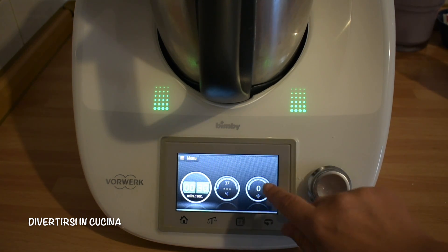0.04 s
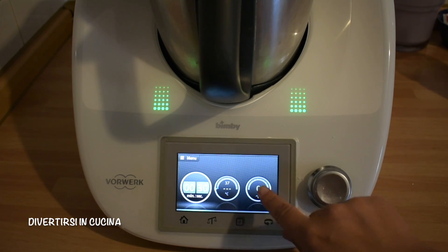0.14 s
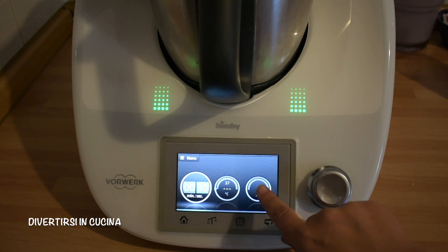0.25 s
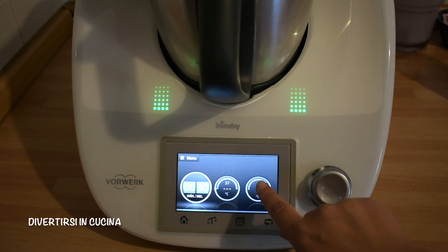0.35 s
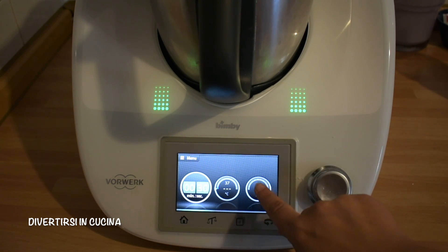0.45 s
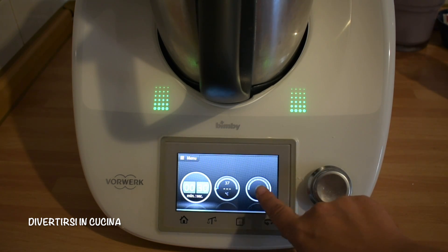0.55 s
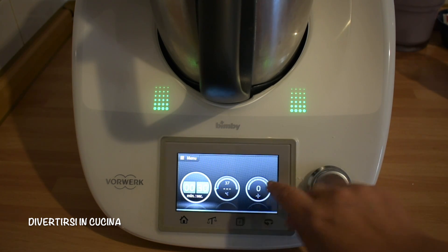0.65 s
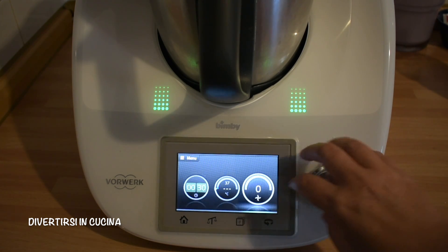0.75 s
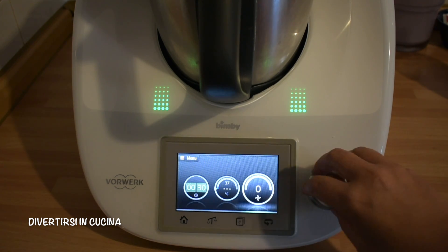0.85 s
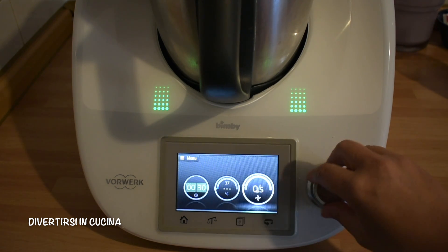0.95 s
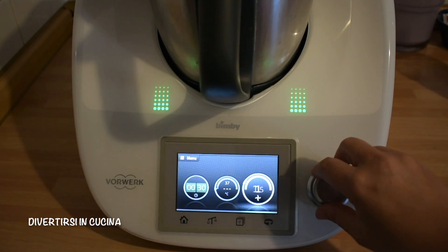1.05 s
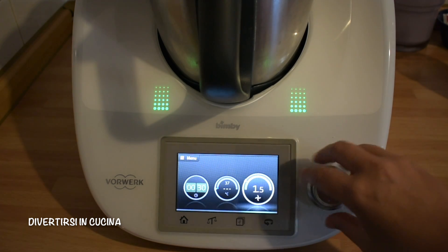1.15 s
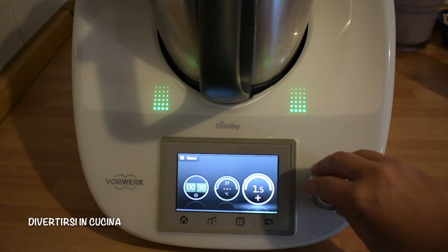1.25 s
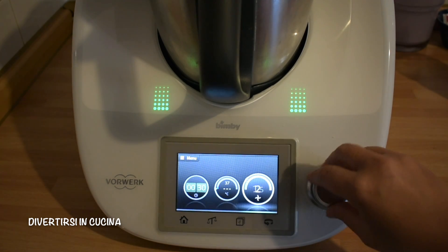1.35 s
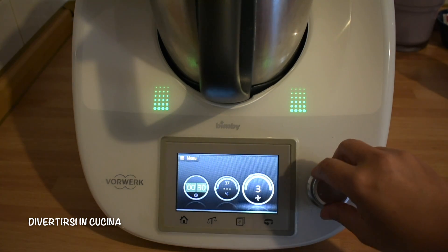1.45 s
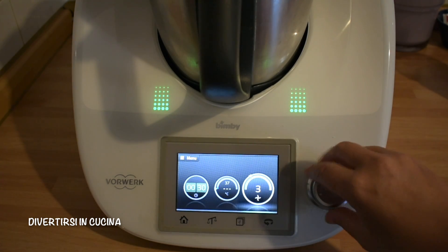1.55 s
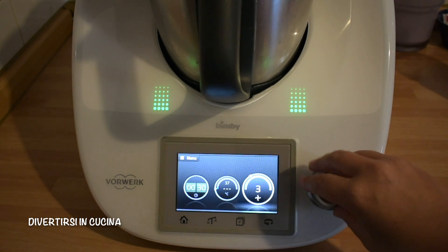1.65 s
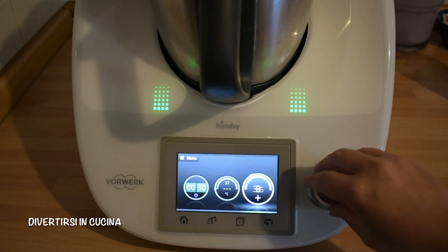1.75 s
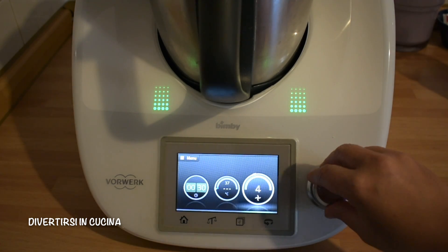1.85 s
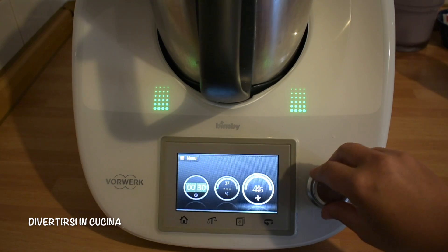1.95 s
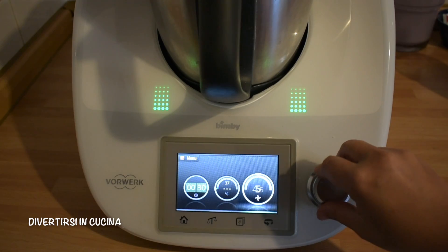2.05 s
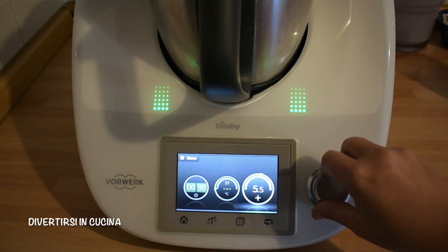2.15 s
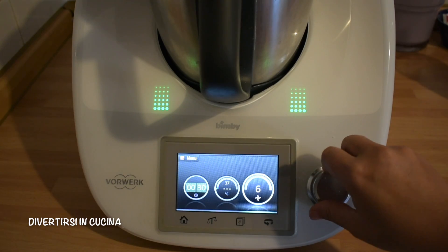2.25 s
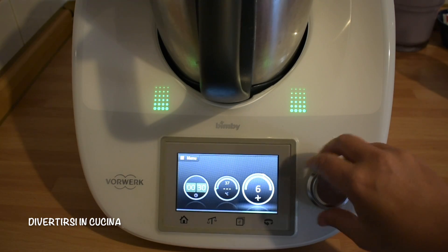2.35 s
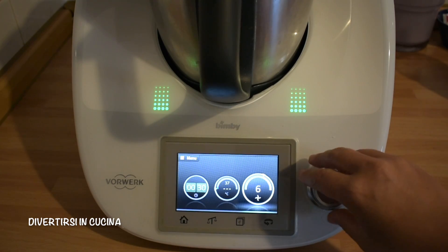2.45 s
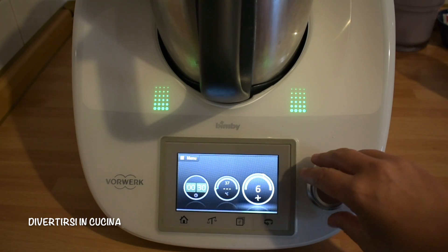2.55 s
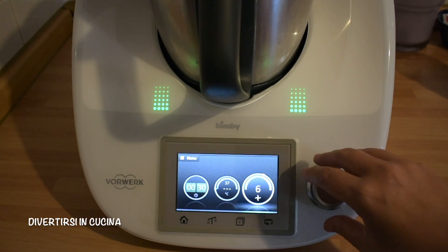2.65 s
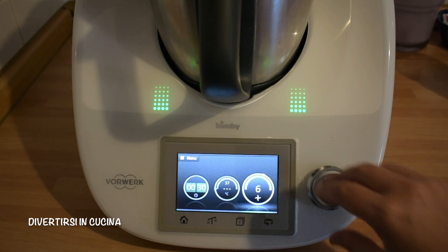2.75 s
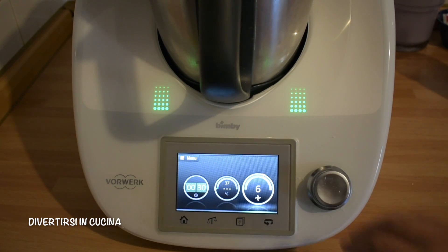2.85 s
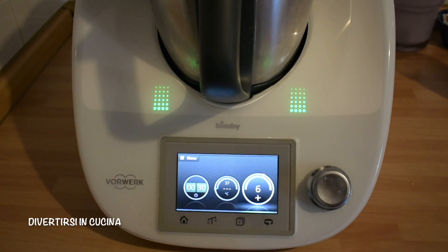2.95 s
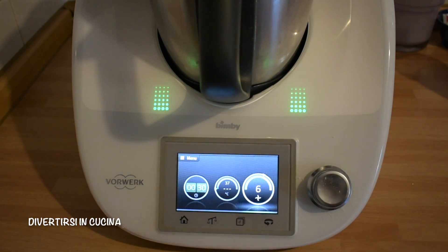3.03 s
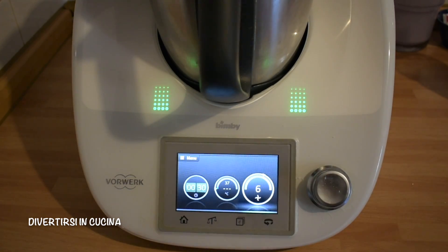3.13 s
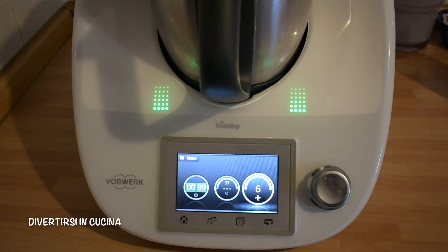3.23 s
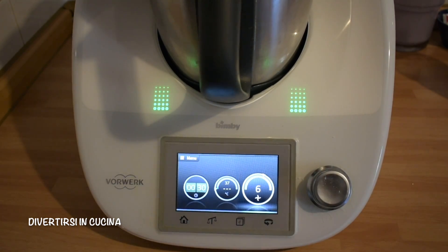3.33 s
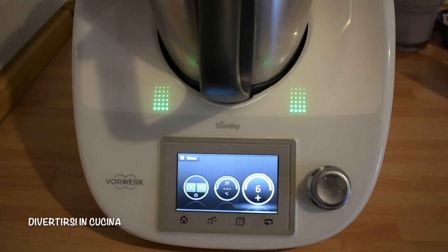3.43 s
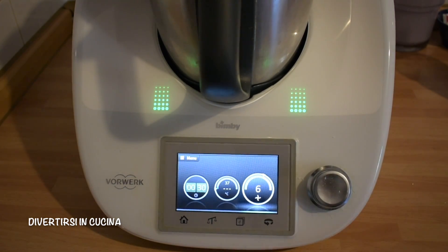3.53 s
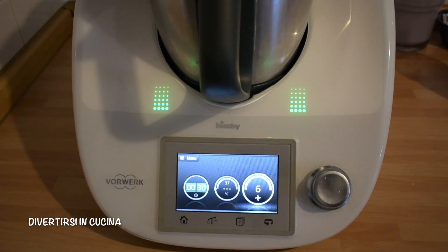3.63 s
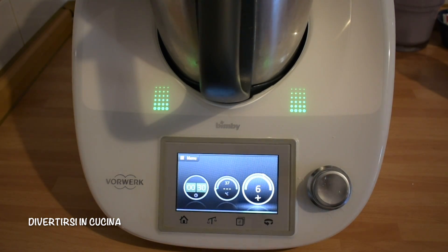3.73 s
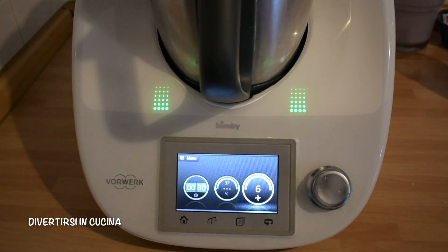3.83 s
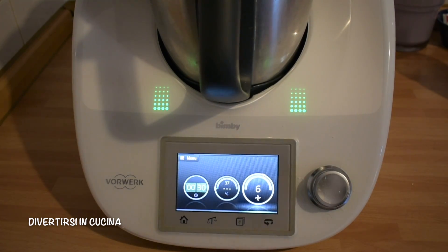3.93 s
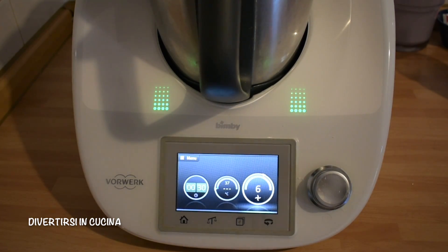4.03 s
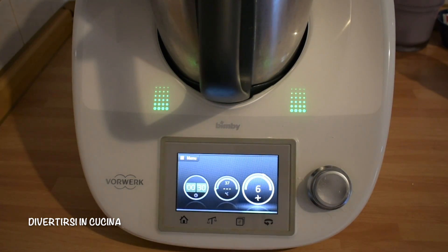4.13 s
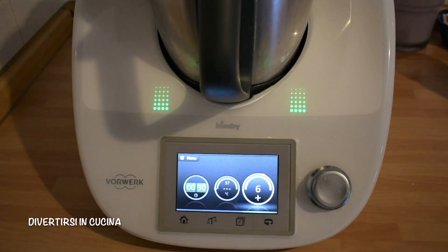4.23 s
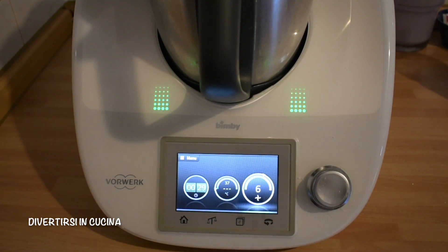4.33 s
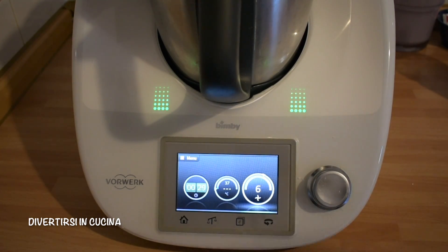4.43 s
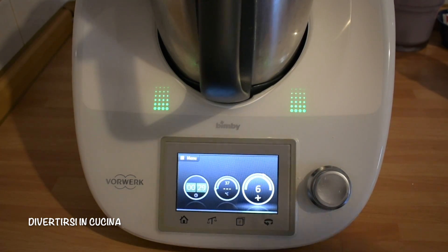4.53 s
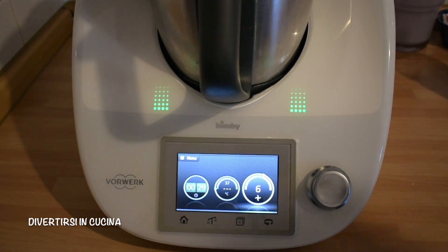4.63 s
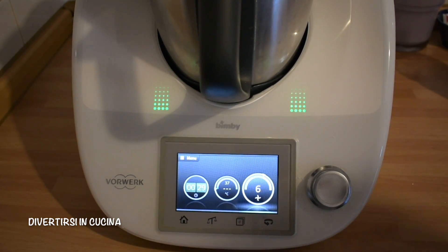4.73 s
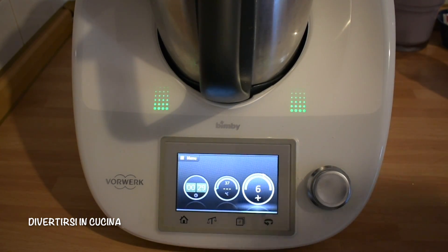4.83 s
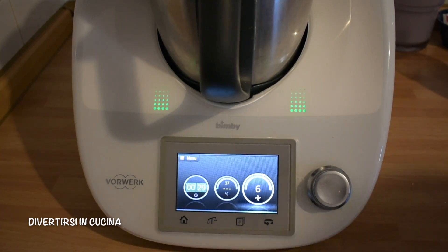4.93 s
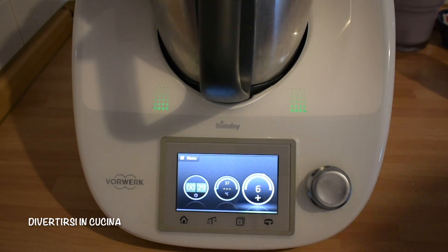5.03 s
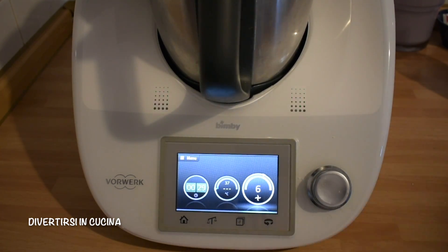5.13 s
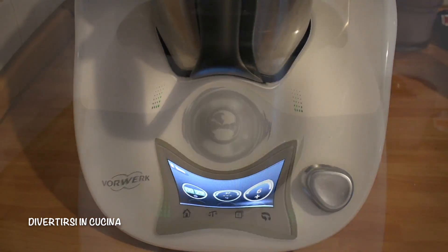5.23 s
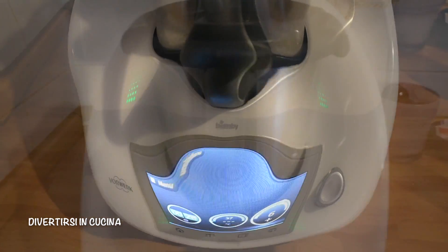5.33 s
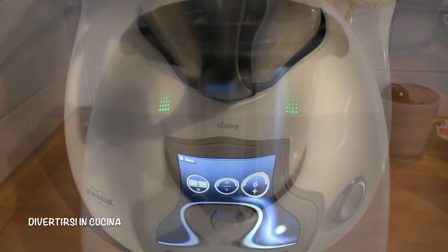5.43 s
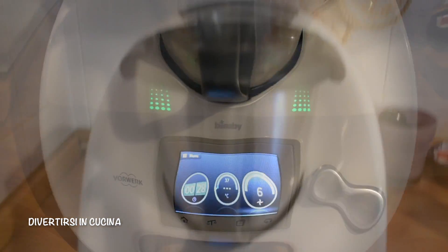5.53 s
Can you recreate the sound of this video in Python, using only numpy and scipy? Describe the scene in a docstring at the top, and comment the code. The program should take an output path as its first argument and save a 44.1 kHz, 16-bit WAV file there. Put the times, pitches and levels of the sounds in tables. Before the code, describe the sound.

Close in a small kitchen, a soft noise fades to near silence. A food processor's dial clicks in uneven bursts while a small geared lid lock whirrs and sags in pitch. After more clicks, coils buzz in steps, the frame squeals, and the motor bursts into a loud whine, grinding nuts in the steel bowl until the end.

```python
"""A kitchen food processor, close to the microphone: its blades grind nuts in the steel bowl under a loud whine.
Before that a soft noise fades out, the speed dial clicks round and a small geared drive locks the lid.
Then coils buzz in steps, the frame squeals and the main motor runs. Whine and howl are partials of the shaft;
clicks, soft noise and grinding are noise or random blows through spectra and resonances.
A small kitchen answers the dial and the lock; a quiet floor of noise lies under it all."""
import sys
import numpy as np
from scipy import signal
from scipy.fft import rfft, irfft, next_fast_len
from scipy.io import wavfile
from scipy.ndimage import map_coordinates

SR = 44100
rng = np.random.default_rng(int(sys.argv[2]) if len(sys.argv) > 2 else 0)


def waveform_to_disk(signal):
    """Save audio, clipped to [-1, 1], as 16-bit WAV at the path in sys.argv[1]."""
    frames = np.transpose(np.atleast_2d(signal))
    scaled = np.clip(frames, -1, 1) * 32767
    samples = np.round(scaled).astype(np.int16)
    wavfile.write(sys.argv[1], SR, samples)


N = 246078


def amp(db):
    """Decibels to gain."""
    return 10 ** (np.asarray(db) / 20)


def unit(x):
    """Scale to rms 1."""
    return x / np.sqrt(np.mean(x ** 2) + 1e-20)


def along(points, hz):
    """Interpolate (Hz, value) points on a log frequency axis."""
    f, v = np.transpose(points)
    return np.interp(np.log(hz + 1), np.log(f + 1), v)


def curves(rows):
    """One value per sample for each column after the time."""
    s, *cols = np.transpose(rows)
    return [np.interp(np.arange(N) / SR, s, c) for c in cols]


def noise():
    """White noise."""
    return rng.standard_normal(N)


def wobble(rate):
    """A smooth random curve, rate knots a second."""
    coarse = np.arange(0, N + 32, 32)
    knots = rng.standard_normal(int(N * rate / SR) + 4)
    smooth = map_coordinates(knots, [coarse * rate / SR])
    return np.interp(np.arange(N), coarse, smooth)


def filtered(x, response):
    """Multiply the spectrum of x by a complex response of frequency."""
    m = next_fast_len(len(x) + SR // 4)
    return irfft(rfft(x, m) * response(np.fft.rfftfreq(m, 1 / SR)), m)[:len(x)]


def coloured(x, spectrum):
    """Shape x with a (Hz, dB) spectrum, at rms 1."""
    return unit(filtered(x, lambda hz: amp(along(spectrum, hz))))


def ringing(x, modes):
    """Ring (Hz, width Hz, dB) resonances of alternating sign with x, at rms 1."""
    def response(f):
        total = 0
        for k, (centre, width, db) in enumerate(modes):
            band = 1j * f * width / (centre ** 2 - f ** 2 + 1j * f * width)
            total = total + (-1) ** k * amp(db) * band
        return total
    return unit(filtered(x, response))


def without_bass(x, edge_hz):
    """A small body radiates no deep bass."""
    return filtered(x, lambda hz: 1 / np.sqrt(1 + (edge_hz / (hz + 1)) ** 12))


def impacts(rate, spread_db):
    """Random tiny blows, rate a second, of widely varying strength."""
    struck = rng.random(N) < rate / SR
    strength = amp(spread_db * np.clip(noise(), -2, 2))
    return unit(struck * noise() * strength)


def tone(turns, order, flutter_db, smear):
    """One partial of a rotation, randomly shaken in level and phase (smear in radians), at rms 1."""
    shake = amp(flutter_db * unit(wobble(14) + wobble(45)))
    drift = smear * unit(wobble(18) + 1.06 * wobble(70))
    return unit(shake * np.sin(2 * np.pi * order * turns + drift))


def held(start, end, rise, fall):
    """Gain that is 1 from start to end (s), rising before and falling after at so many dB a second."""
    t = np.arange(N) / SR
    return amp(-rise * np.maximum(start - t, 0) - fall * np.maximum(t - end, 0))


def hump(s, length):
    """A smooth hump of height 1 around a moment."""
    return np.exp(-np.minimum((2 * (np.arange(N) / SR - s) / length) ** 2, 30))


def echoes(x, t60, wet_db):
    """Dense reflections inside the bowl comb the sound finely."""
    t = np.arange(SR // 8) / SR
    tail = rng.standard_normal(len(t)) * amp(-60 * t / t60)
    answer = signal.fftconvolve(x, tail / np.linalg.norm(tail))[:N]
    return unit(x + amp(wet_db) * answer)


# Quiet of the place, relative spectrum: pitch_hz, level_db
FLOOR = [(15, -40), (25, -34), (75, -5), (119, -7.5), (482, -10), (523, -12.5), (722, -13.5), (1300, -14),
         (1620, -15), (6380, -22.5), (15500, -30)]


def quiet_floor():
    """Steady coloured noise under every other sound."""
    return amp(-58.5) * coloured(noise(), FLOOR)


# Soft opening noise, relative spectrum: pitch_hz, level_db
SOFT = [(24, -40), (40, -7), (178, 1.5), (280, -2.5), (372, -10), (700, -10.5), (1120, -10), (1830, -17.5),
        (4010, -20), (5000, -30), (6710, -27), (14000, -44)]


def fading_noise(start_db=-39, fade_db_per_s=36, sizzle_db=-53):
    """A soft noise fades out steadily; a narrow sizzle rides on it for a moment."""
    fade = amp(start_db - fade_db_per_s * np.arange(N) / SR)
    soft = fade * coloured(noise(), SOFT)
    sizzle = coloured(noise(), [(3500, -32), (4800, 1), (5500, -4), (7000, -30)])
    flicker = amp(sizzle_db + 1.8 * wobble(30))
    return soft + held(0.075, .33, rise=250, fall=84) * flicker * sizzle


# Dial detents and latch knocks, each band's level relative to its base: start_s, middle_db, body_db, sparkle_db
CLICKS = [(0.901, -45, -55, -73), (0.9735, -14.5, -34.5, -38.5), (1.0075, -9.5, -32, -39),
          (1.0273, -21, -27, -58), (1.044, -12.5, -34, -35), (1.109, -13, -44, -36), (1.182, -35, -37, -51),
          (1.4048, -14, -31.5, -36.5), (1.4383, -13.5, -34.5, -38), (1.4713, -16, -45, -34.5),
          (1.83, -13.5, -41, -36.5), (1.8936, -16, -40, -38), (1.938, -23, -46.5, -33),
          (2.0248, -14.5, -35, -37), (2.0835, -29, -45, -32.5), (2.1052, -13, -36, -37),
          (2.1772, -11.5, -33, -35.5), (2.2621, -12, -35, -35), (2.6478, -25, -50.5, -37.5),
          (2.814, -49, -62, -61)]
# Plastic shell, relative spectrum: pitch_hz, level_db
PLASTIC = [(71, -49), (120, -16), (319, -14), (649, -3.5), (995, -4.5), (1270, -9.5), (1950, -0.5),
           (2750, -5), (3240, 0), (3660, -7.5), (4390, -5.5), (4760, -13), (10300, -17.5), (12900, -26),
           (15500, -37)]
BODY_BASE_DB, MIDDLE_BASE_DB, SPARKLE_BASE_DB = 10.0, -5.5, 6.5


def clicks(rebound_s=0.0048, rebound_db=-4, snap_t60=0.029, rise_s=0.001):
    """Each detent snaps, rebounds and rattles the plastic shell for a few milliseconds."""
    out, t = np.zeros(N + SR), np.arange(SR // 8) / SR

    def snap(u):
        """A fast rise and an exponential decay."""
        since = np.maximum(u, 0)
        return (1 - np.exp(-since / rise_s)) * amp(-60 * since / snap_t60)

    shape = np.hypot(snap(t), amp(rebound_db) * snap(t - rebound_s))
    shell = coloured(noise(), PLASTIC)
    above_body = without_bass(shell, edge_hz=1260)
    sparkle = without_bass(shell, edge_hz=7200)
    bands = np.array([unit(shell - above_body), unit(above_body - sparkle), unit(sparkle)])
    for s, middle_db, body_db, sparkle_db in CLICKS:
        at = round(s * SR)
        gains = amp([BODY_BASE_DB + body_db, MIDDLE_BASE_DB + middle_db, SPARKLE_BASE_DB + sparkle_db])
        out[at:at + len(t)] += shape * (gains @ bands[:, at:at + len(t)])
    return out[:N]


# Reverberation of the small kitchen: pitch_hz, t60_s
KITCHEN = [(150, 0.86), (1000, 0.36), (3000, 0.34), (7000, 0.28), (14000, 0.23)]


def kitchen(x):
    """The room's answer, a diffuse tail: each frequency dies at its own speed."""
    out, step = np.zeros(N + 2 * SR), SR // 8
    for at in range(0, N, step):  # a new random tail for each eighth of a second
        hz, t, z = signal.stft(rng.standard_normal(SR // 2), SR, nperseg=256)
        decay = amp(-60 * t / along(KITCHEN, hz)[:, None])
        tail = signal.istft(z * decay, SR, nperseg=256)[1]
        answer = signal.fftconvolve(x[at:at + step], tail / np.linalg.norm(tail))
        out[at + round(.005 * SR):][:len(answer)] += answer  # 5 ms pre-delay
    return out[:N]


# Knocks and snaps that ring on briefly: start_s, pitch_hz, level_db
PINGS = [(.912, 200, -41.5), (1.03, 397, -23), (1.186, 1250, -25), (1.939, 8800, -27), (2.084, 13300, -33),
         (2.648, 12600, -25.5), (2.649, 10000, -35), (2.649, 6330, -32.5), (2.649, 1430, -34.5)]


def pings(t60=0.044, rise_s=0.00067):
    """A stiff part rings in a narrow band after its snap."""
    out, t = np.zeros(N + SR), np.arange(SR // 8) / SR
    for s, hz, db in PINGS:
        ring = ringing(rng.standard_normal(len(t)), [(hz, 120 + .04 * hz, 0)])
        envelope = amp(db - 60 * t / t60) * (1 - np.exp(-t / rise_s))
        out[round(s * SR):][:len(t)] += envelope * ring
    return out[:N]


# Lid lock drive, its mean gear mesh: start_s, pitch_hz
LOCK_SPEED = [(1.0, 1361), (1.12, 1342), (1.18, 1325), (1.215, 1277), (1.39, 1232), (1.5, 1207),
              (1.63, 1118), (1.665, 928), (1.73, 596)]
# How hard it works: start_s, level_db
LOCK_EFFORT = [(1.0, 0.5), (1.2, 0), (1.3, -3), (1.4, 4), (1.5, 0.5), (1.56, 1.5), (1.64, 2.5)]
# Gear whine, relative levels of harmonics 1 to 5: level_db
MESH_DB = [-6.5, 2, 1, -7.5, -8.5]
# Whirr, relative spectrum: pitch_hz, level_db
WHIRR = [(41, -59), (70, -32), (144, -11.5), (655, -14.5), (840, -6.5), (1230, -8.5), (1940, -12),
         (2540, -17), (3120, -8), (3410, -13), (4280, -14.5), (5610, -13), (7350, -25), (15500, -32)]
# Resonances of the drive's mount: pitch_hz, width_hz, level_db
SHELL = [(140, 30, 2.5), (2580, 160, -1), (3270, 180, 1.5), (5670, 270, -18)]
LOCK_ON_S, LOCK_ENGAGED_S, LOCK_OFF_S = 1.0, 1.117, 1.662  # starts, gears take the load, coasts out
GEAR_DB, MOUNT_DB, WHIRR_DB = -35.5, -42.5, -40  # before the effort
SING_HZ, SING_WIDTH_HZ, SING_DB = 3390, 95, 9.5  # a partial swells as it glides through this resonance


def lid_lock(gear_effort=0.26):
    """A small gear drive whirrs, shakes its mount and slows as the arms press on the lid."""
    mesh_hz, effort_db = curves(LOCK_SPEED)[0], curves(LOCK_EFFORT)[0]
    mesh_cycles = np.cumsum(mesh_hz * (1 + .004 * wobble(90))) / SR
    whine = np.zeros(N)
    for k, db in enumerate(MESH_DB, 1):
        swell_db = SING_DB / (1 + ((k * mesh_hz - SING_HZ) / SING_WIDTH_HZ) ** 2)
        whine += amp(db + swell_db) * tone(mesh_cycles, k, flutter_db=3.5, smear=.7)
    whine /= np.linalg.norm(amp(MESH_DB))
    whirr = coloured(impacts(rate=14000, spread_db=1), WHIRR)
    mount = ringing(noise(), SHELL)
    engaged = held(LOCK_ENGAGED_S, LOCK_OFF_S, rise=300, fall=280)
    gears = engaged * (amp(GEAR_DB) * whine + amp(MOUNT_DB) * mount)
    drive = held(LOCK_ON_S, LOCK_OFF_S, rise=870, fall=340) * amp(WHIRR_DB) * whirr
    return without_bass(amp(gear_effort * effort_db) * gears + amp(effort_db) * drive, edge_hz=107)


# The current is switched up in steps, levels at each onset: start_s, buzz_db, frame_db
CURRENT_STEPS = [(2.856, -57, -52), (2.945, -44.5, -46), (3.025, -37.5, -38)]
# Buzz of the windings, relative levels: multiple of the switching rate, level_db
BUZZ = [(1, 4), (2, -1), (3, -5), (4, -17), (6, -21), (12.35, -20)]
# Resonances of the motor's frame, heard here and in spin_up: pitch_hz, width_hz, level_db
FRAME = [(181, 16, -11.5), (880, 37, -6.5), (1025, 50, -5.5), (1370, 97, -13.5), (1675, 62, -6),
         (1870, 17, 4.5), (2570, 500, -26), (3760, 830, -34.5)]
CURRENT_END_S, CURRENT_SAG_DB_PER_S = 3.2, 60  # each step overshoots and settles


def coils(switch_hz=911, hiss_db=-6):
    """The switched current buzzes in the windings and frame, step by step, with a broad hiss."""
    cycles = switch_hz * np.arange(N) / SR
    buzz = unit(sum(amp(db) * tone(cycles, order, flutter_db=5.5, smear=0.83) for order, db in BUZZ))
    hiss = coloured(noise(), [(100, -22), (1300, 4), (3500, -9), (9000, -30)])
    frame = ringing(noise(), FRAME) + amp(hiss_db) * hiss
    ends = [row[0] for row in CURRENT_STEPS[1:]] + [CURRENT_END_S]
    out = np.zeros(N)
    for (s, buzz_db, frame_db), end in zip(CURRENT_STEPS, ends):
        gate = held(s, s, rise=4500, fall=CURRENT_SAG_DB_PER_S) * held(0, end, 0, fall=600)
        out += gate * (amp(buzz_db) * buzz + amp(frame_db) * frame)
    return out


def spin_up(torque_db=-15, squeal_hz=1878, squeal_db=-18.0, twitch_db=-43.0, shudder_db=-31):
    """The frame sings as the rotor twitches into line, then squeals and shudders under the starting torque."""
    twitch = amp(twitch_db) * held(2.886, 2.917, rise=4000, fall=900)
    torque = amp(torque_db) * held(3.105, 3.2, rise=233, fall=310)
    frame = (twitch + torque) * ringing(noise(), FRAME)
    squeal = tone(squeal_hz * np.arange(N) / SR, order=1, flutter_db=3, smear=.6)
    squeal = amp(squeal_db) * held(3.1, 3.2, rise=220, fall=300) * squeal
    rumble = coloured(noise(), [(70, -40), (92, -13), (115, 5), (150, -5), (250, -35)])
    shudder = amp(shudder_db) * held(3.13, 3.22, rise=420, fall=62) * rumble
    return frame + squeal + shudder


# The blades bite into a batch of nuts: height of the bite start_s, length_s, extra load_db
BITES = [(3.227, 0.18, 4.5), (3.543, 0.097, 5.5), (3.883, 0.15, 2), (4.06, .13, 4), (4.525, .13, 6),
         (4.95, .16, 2.5), (5.077, .07, 2.3), (5.236, 0.046, 2.5)]


def load_db():
    """Extra load on the blades: one smooth hump for each bite."""
    return sum(db * hump(s, length) for s, length, db in BITES)


def blades_in_nuts():
    """Steep rise in level as the blades reach the nuts."""
    return held(3.125, N / SR, rise=338.5, fall=0)


# Main shaft, also turning the blades in grinding: start_s, turns_per_s
SHAFT = [(3.05, 85), (3.25, 74), (3.43, 76.6), (3.54, 74), (3.62, 75.6), (3.85, 76.8), (3.95, 76.7),
         (4.03, 76), (4.11, 77), (4.37, 76.6), (4.58, 74.7), (4.68, 79.2), (4.83, 79.4), (4.91, 77.2),
         (5.3, 78), (5.58, 77.7)]
# Weaker partials of the drive: multiple of the shaft, level_db (rms)
PARTIALS = [(3, -38.5), (6, -40), (8, -40), (11, -32.5), (14, -30.5), (17.5, -24.5), (24, -33), (27.5, -33),
            (29.3, -34), (33, -39), (37.6, -36.5)]
WHINE_DB, WHINE_BEST_HZ, WHINE_WIDTH_HZ = -14.7, 911, 42  # loudest on the bowl's resonance
WHINE_CHOKE, HOWL_CHOKE = 1.8, 0.67  # dB lost per dB of load
HOWL_DB, FREE_DB = -14.8, 2.0  # on coarse pieces; swell while the blades run freely
LULL_DB = 5  # the whine recedes for a moment once the coarse pieces are gone
UPPER_SHARE, UPPER_FROM_HZ, UPPER_PER_HZ = 0.39, 77.8, 0.46  # faster, the howl moves half an order up


def motor():
    """The shaft's orders sing with its speed; each bite chokes the whine and the howl."""
    speed, load = curves(SHAFT)[0], load_db()
    turns = np.cumsum(speed) / SR
    resonance = 1 / np.hypot(1, 2 * (12 * speed - WHINE_BEST_HZ) / WHINE_WIDTH_HZ)
    lull = held(4.69, 5.1, rise=400, fall=400)
    whine_gain = amp(WHINE_DB - WHINE_CHOKE * load - LULL_DB * lull) * resonance
    whine = whine_gain * tone(turns, order=12, flutter_db=2.5, smear=0.19)
    upper = np.clip(UPPER_SHARE + UPPER_PER_HZ * np.maximum(speed - UPPER_FROM_HZ, 0), 0, 1)
    lower_howl = tone(turns, order=20, flutter_db=1.7, smear=.25)
    upper_howl = tone(turns, order=20.5, flutter_db=1.7, smear=.25)
    free = held(4.67, 5.26, rise=230, fall=121)
    howl_gain = amp(HOWL_DB - HOWL_CHOKE * load + FREE_DB * free)
    howl = howl_gain * (np.sqrt(1 - upper) * lower_howl + np.sqrt(upper) * upper_howl)
    rest = sum(amp(db) * tone(turns, order, flutter_db=1.0, smear=0.54) for order, db in PARTIALS)
    emerging = held(3.29, N / SR, rise=65, fall=0)
    return emerging * blades_in_nuts() * (whine + howl + rest)


def easing_db(coarse_until_s=4.43, finer_db_per_s=2.5):
    """How far the work has eased as the pieces get small."""
    return finer_db_per_s * np.maximum(np.arange(N) / SR - coarse_until_s, 0)


# Nuts against the bowl, relative spectrum: pitch_hz, level_db (per Hz)
CHURN = [(160, -59), (280, -28), (398, -17), (617, -8), (754, -17), (907, -8.5), (1170, -8), (1580, -8),
         (2140, -14), (4110, -22), (4470, -37.5), (5030, -21.5), (9060, -34.5), (12900, -31.5),
         (15500, -46)]
# Main resonances of the bowl: pitch_hz, width_hz, level_db
BOWL = [(614, 93, -10), (852, 47, -7.5), (900, 22, -3.5), (1030, 41, -13), (1353, 11, -10), (1582, 84, -3),
        (1698, 61, -4), (1853, 33, -0.5)]
# Higher resonances of the steel: pitch_hz, width_hz, level_db
STEEL = [(2244, 19, -4), (2600, 110, 2), (3133, 39, -2.5), (3214, 59, -4.5), (3470, 86, -3.5),
         (4000, 37, -8), (4083, 90, 1.5), (4880, 136, -0.5), (5130, 85, -1), (5510, 104, -4.5),
         (5880, 42, -7), (6050, 120, -4), (6390, 61, -6.5), (6900, 160, -9)]
# Crackling shards, relative spectrum: pitch_hz, level_db (per Hz)
SHARDS = [(2350, -34), (4000, 1.5), (4480, -5), (5050, -11), (5720, -8), (9020, -10.5), (12300, -10),
          (13900, -10.5), (15600, -20)]
# Low resonances of the housing: pitch_hz, width_hz, level_db
HOUSING = [(119, 14.6, -3.5), (130, 18.7, -3.5), (151.7, 9.3, -5.5), (181.5, 5.5, 1.5), (223, 11, -14),
           (272.4, 11, -10)]


def grinding():
    """Blades fling nuts at the bowl: a dense hail rings the steel, shards crackle, the housing thuds."""
    load, easing = load_db(), easing_db()

    def level(db, by_load, by_easing):
        """Gain of a layer: dB, dB per dB of load, share of the easing."""
        return amp(db + by_load * load - by_easing * easing)

    turns = np.cumsum(curves(SHAFT)[0]) / SR
    clumps_db = 0.76 * wobble(24.91) + 0.62 * wobble(120)
    pass_db = .5 * np.sin(2 * np.pi * turns)  # one heavier pass a turn
    hail = echoes(coloured(impacts(rate=12000, spread_db=1.5), CHURN), t60=0.056, wet_db=-4.5)
    bowl = ringing(impacts(rate=6000, spread_db=3), BOWL)
    steel = echoes(ringing(impacts(rate=8000, spread_db=1.0), STEEL), t60=0.073, wet_db=-10)
    shards = echoes(coloured(impacts(rate=9000, spread_db=4.5), SHARDS), t60=0.054, wet_db=-9)
    thud = unit(without_bass(ringing(impacts(rate=1300, spread_db=0.5), HOUSING), edge_hz=78))
    nuts = level(-18, by_load=0.51, by_easing=0.89) * hail
    nuts += level(-17.5, by_load=.3, by_easing=1.2) * bowl
    nuts += level(-24, by_load=0.16, by_easing=0.091) * steel
    nuts += level(-31.8, by_load=1.2, by_easing=0.48) * shards
    thuds = level(-34, by_load=1.1, by_easing=0.97) * thud
    return blades_in_nuts() * (amp(clumps_db + pass_db) * nuts + thuds)


# Big pieces rattling round the bowl: middle of the rattle start_s, length_s, level_db
CHUNKS = [(3.28, .06, -19.5), (3.35, 0.058, -19), (3.87, 0.046, -21), (4.02, 0.044, -23.5),
          (4.077, 0.044, -25), (4.22, .04, -24), (4.298, .04, -22), (4.38, 0.055, -22), (4.57, .04, -20),
          (5.02, .03, -24)]
# Low resonances they ring: pitch_hz, width_hz, level_db
BOWL_LOW = [(494, 76, -9), (629, 75, 1)]


def chunks():
    """A big piece rattles against the wall for a few turns of the blade."""
    rattle = sum(amp(db) * hump(s, length) for s, length, db in CHUNKS)
    return rattle * ringing(impacts(rate=2000, spread_db=0.5), BOWL_LOW)


def scene():
    """Dial, lock and motor close to the microphone, over the quiet room."""
    dial = without_bass(clicks() + pings(), edge_hz=140)
    lock = lid_lock()
    room = kitchen(amp(-6.6) * dial + amp(-3.5) * lock)
    before = quiet_floor() + fading_noise() + dial + room + lock
    running = coils() + spin_up() + motor() + grinding() + chunks()
    return (before + running)[None]


def record(dry, top_hz=15750):
    """The recorder rounds off the highest peaks and keeps nothing above its band limit."""
    rounded = dry[0] / (1 + np.abs(dry[0]) ** 12) ** (1 / 12)
    return filtered(rounded, lambda hz: hz < top_hz)[None]


dry = scene()
out = record(dry)
waveform_to_disk(out)
```